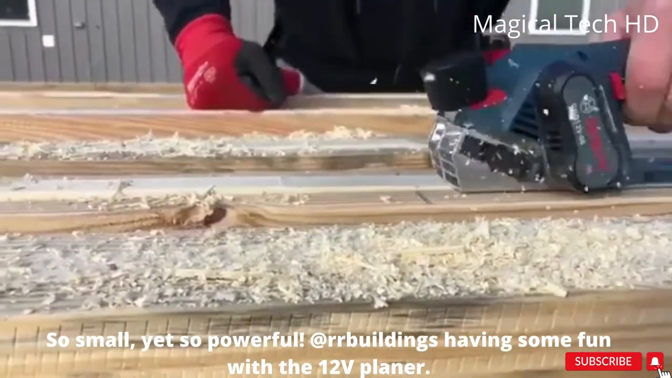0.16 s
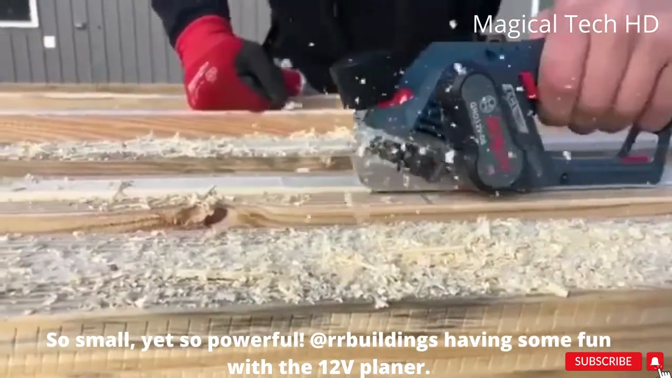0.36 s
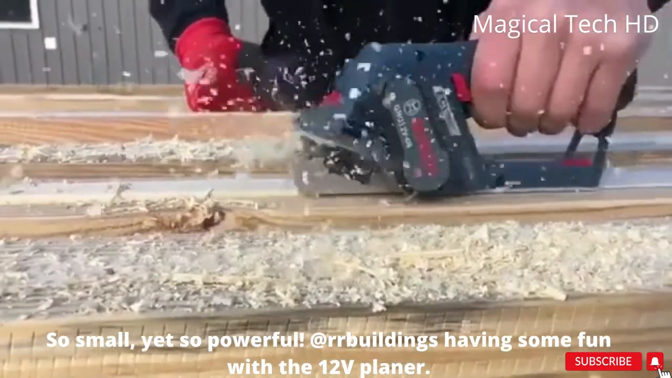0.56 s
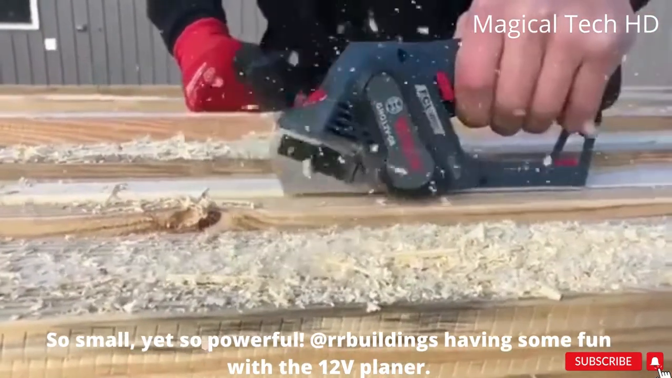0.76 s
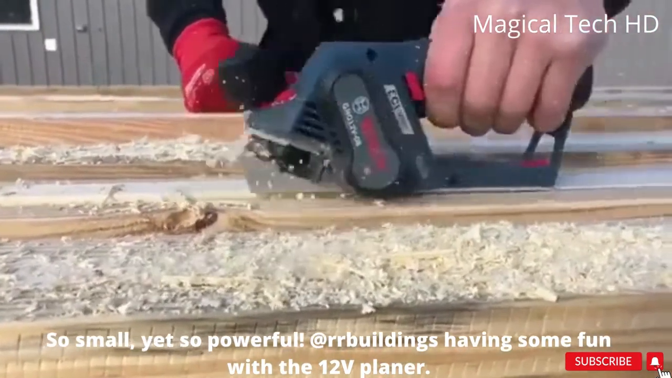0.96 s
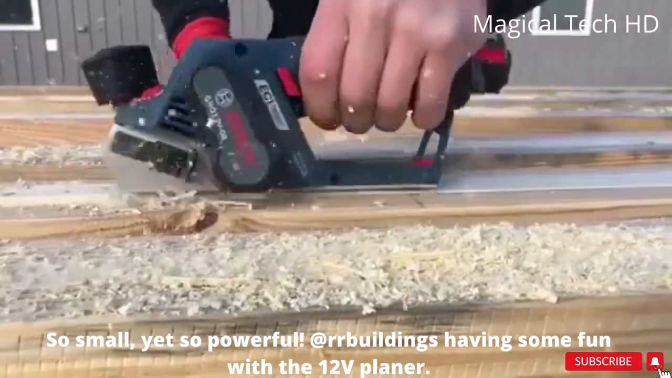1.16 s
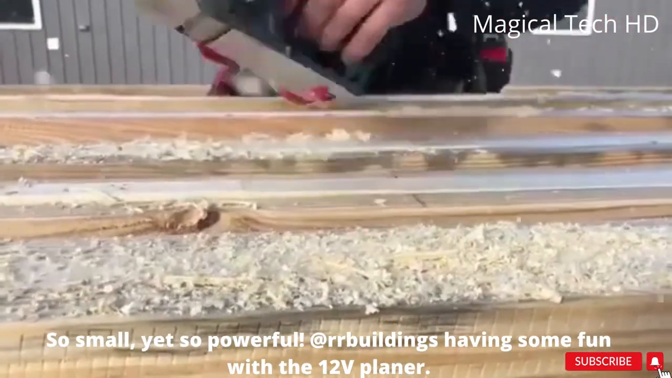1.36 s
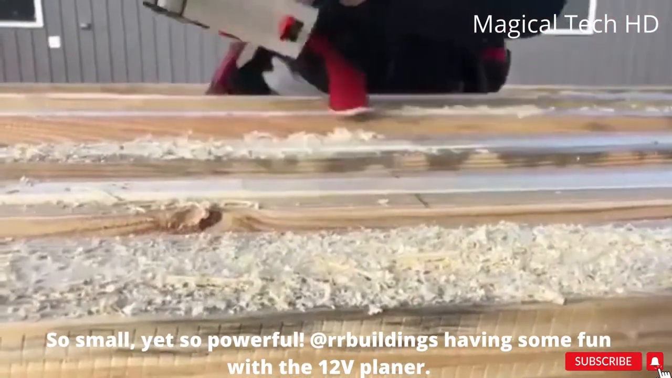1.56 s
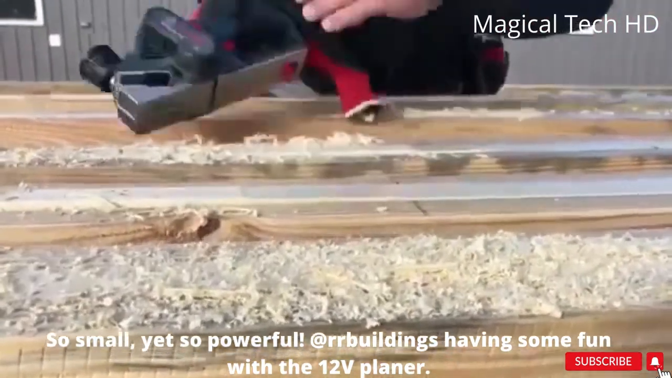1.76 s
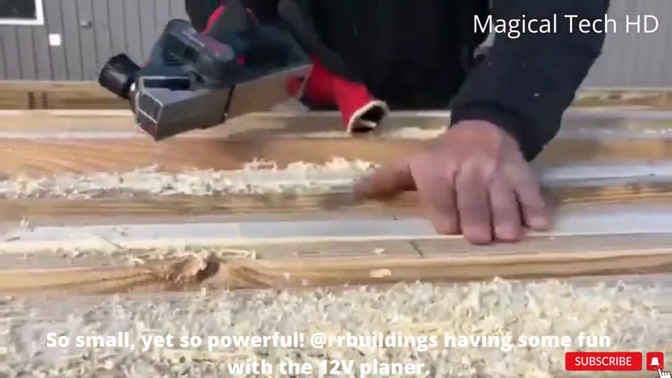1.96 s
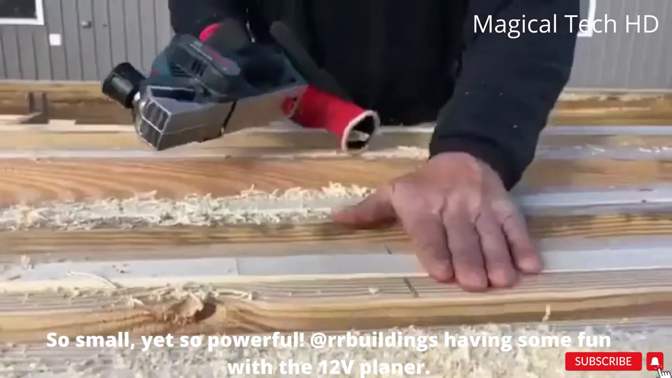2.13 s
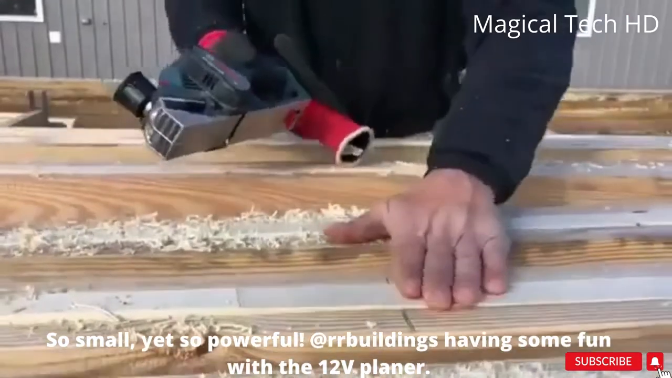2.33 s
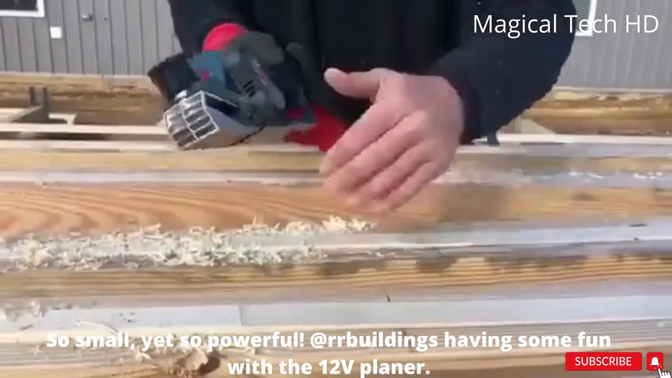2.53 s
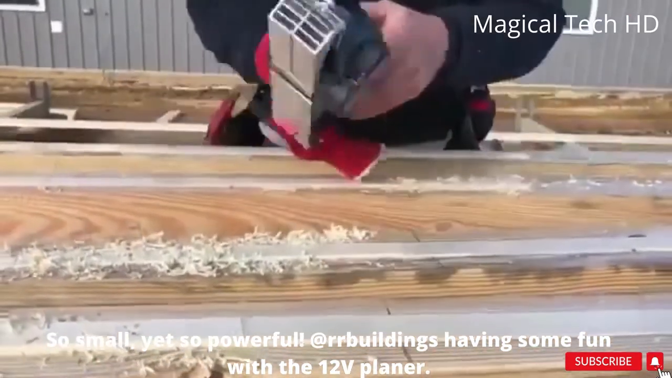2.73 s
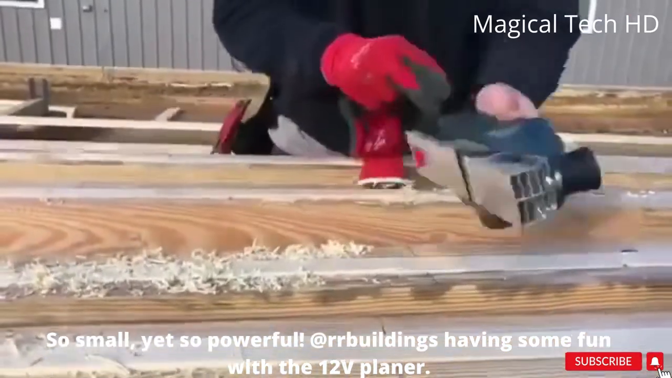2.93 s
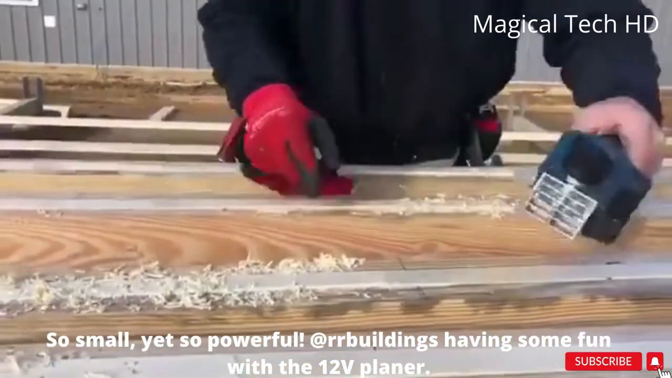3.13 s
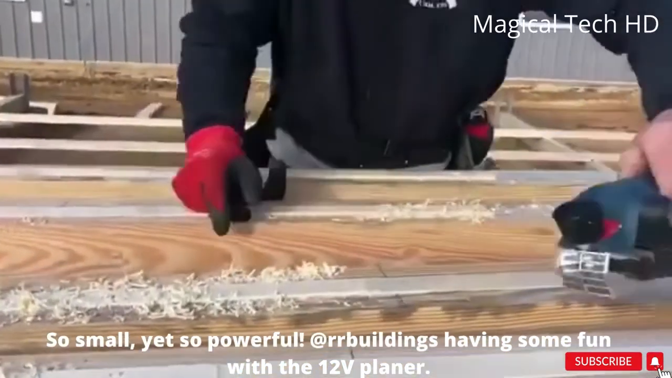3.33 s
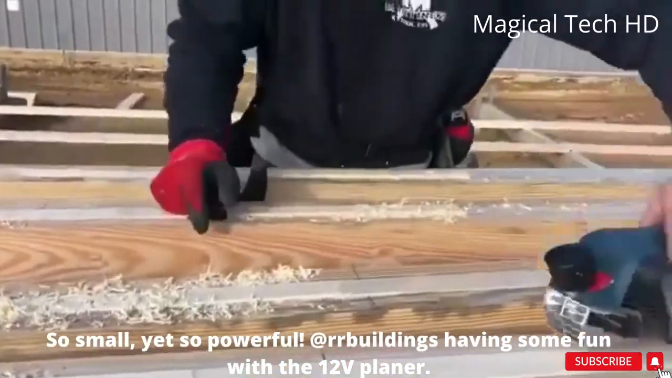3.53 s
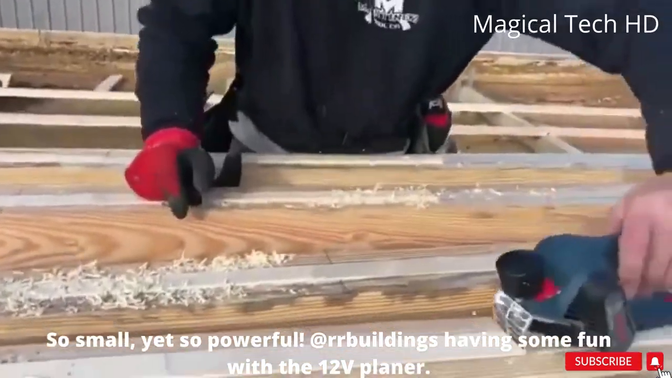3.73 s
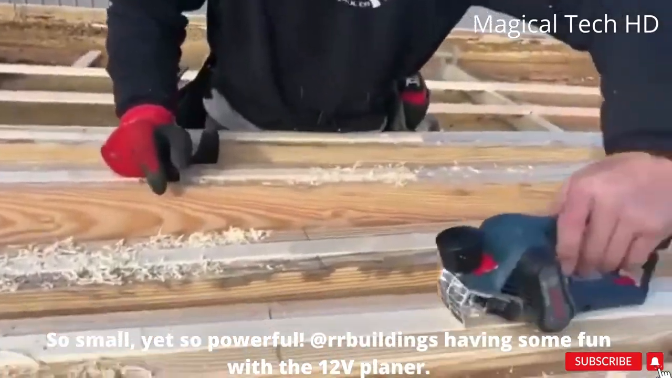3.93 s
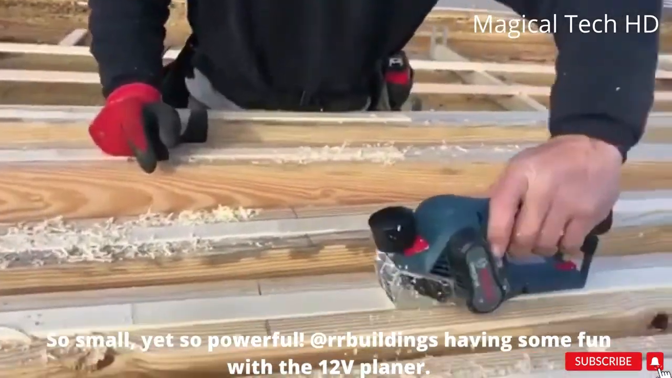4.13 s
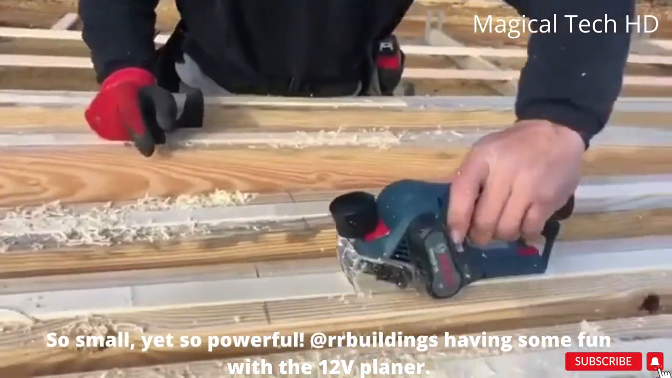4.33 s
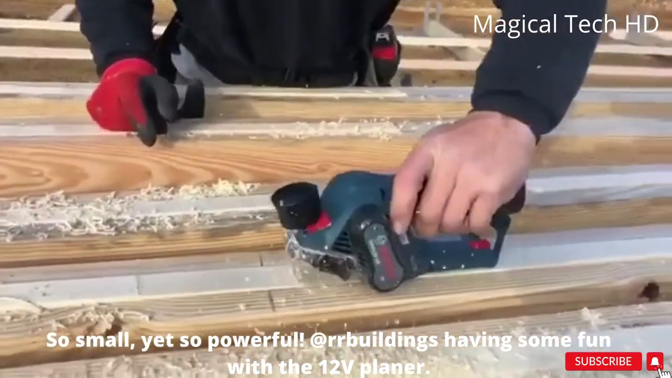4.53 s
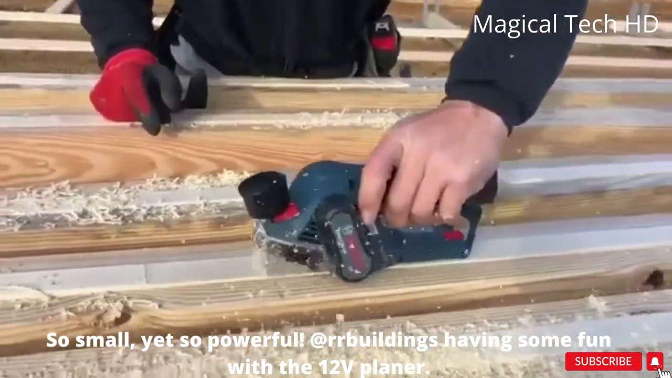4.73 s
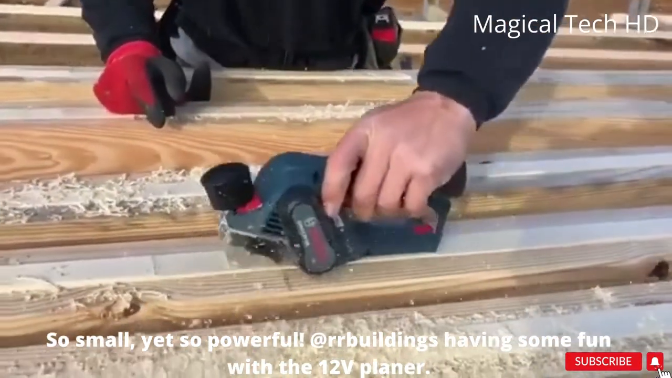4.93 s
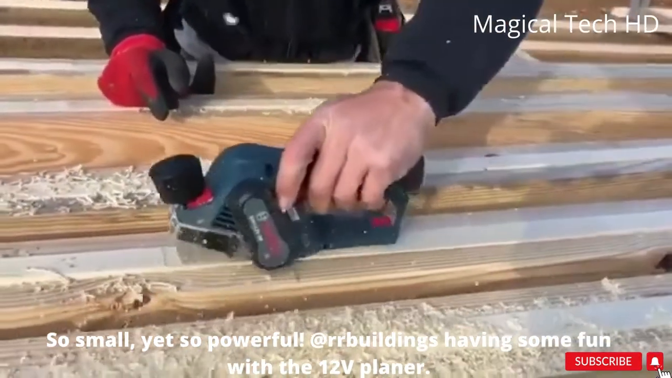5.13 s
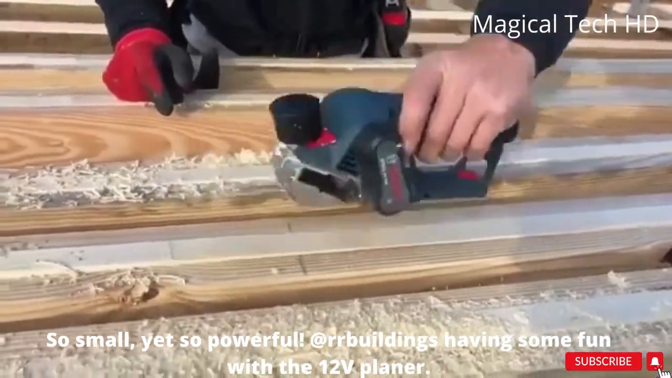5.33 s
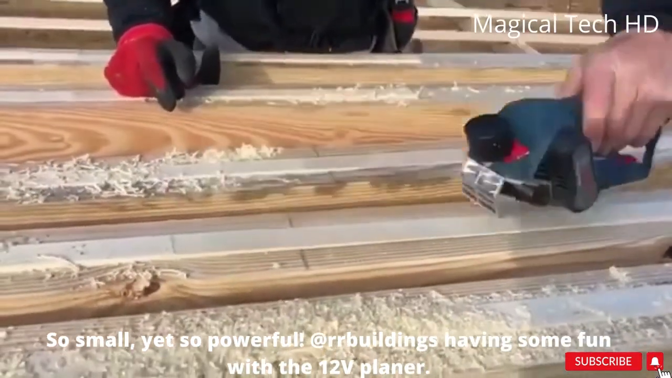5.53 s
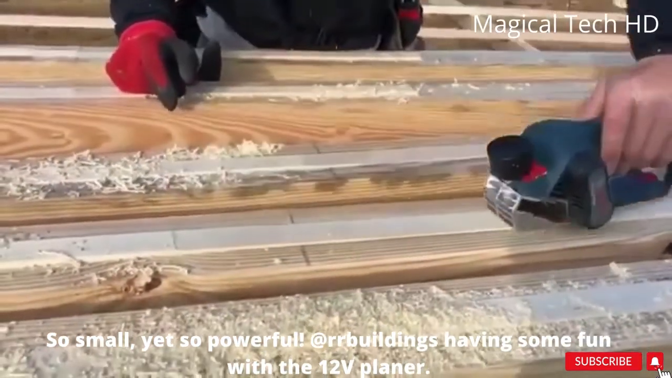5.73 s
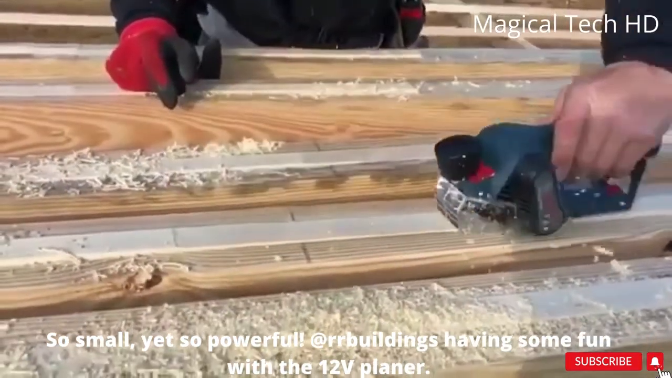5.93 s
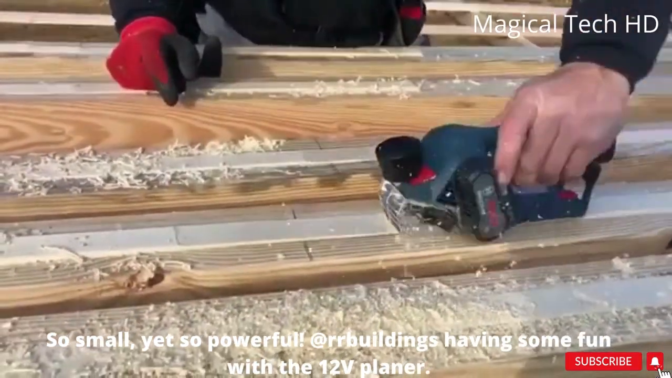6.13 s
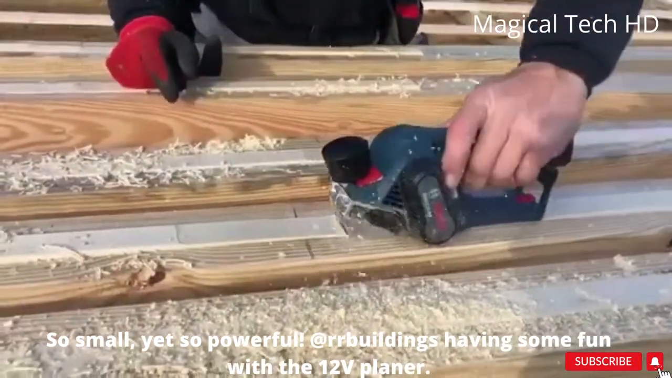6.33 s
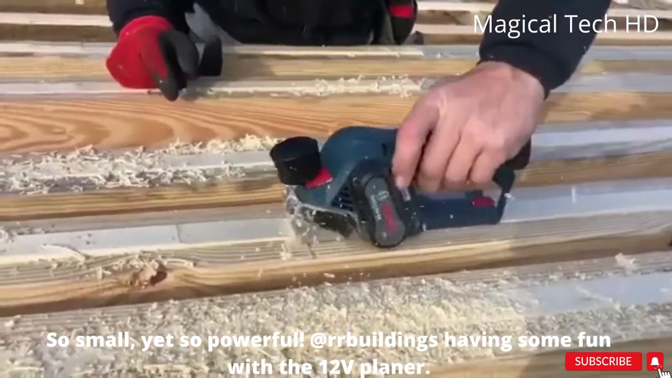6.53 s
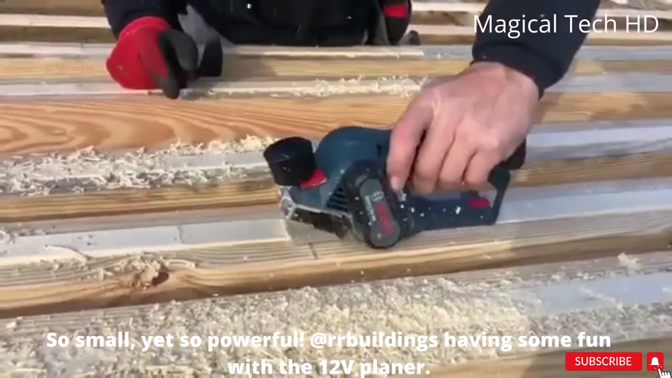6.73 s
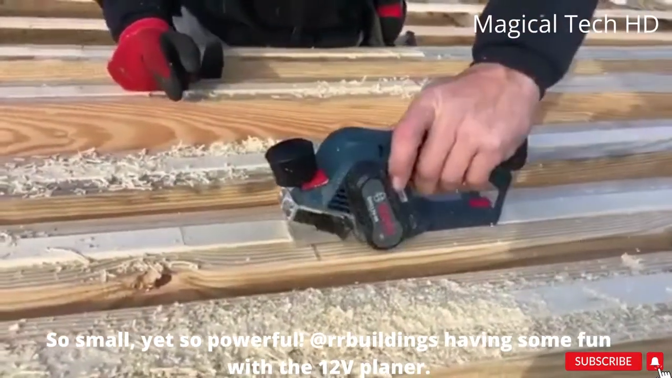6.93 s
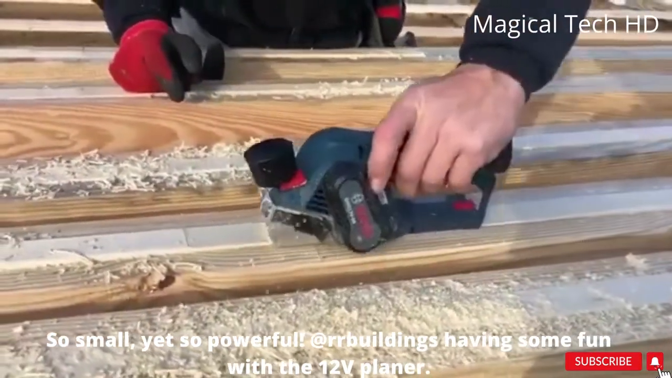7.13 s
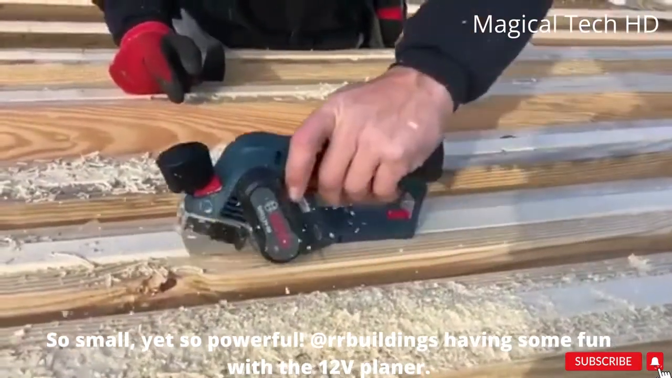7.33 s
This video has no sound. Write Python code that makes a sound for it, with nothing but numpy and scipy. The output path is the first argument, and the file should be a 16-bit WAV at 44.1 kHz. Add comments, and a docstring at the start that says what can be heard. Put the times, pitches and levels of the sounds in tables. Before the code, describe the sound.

A small electric hand planer whines and tears at softwood, brakes to quiet hand strokes and clicks, then spins up and planes again.

```python
"""A cordless hand planer on softwood planks, close to one microphone, with wind buffeting its port throughout.
First it cuts and lifts: the drum's speed sets hum, belt and motor whine and the blade's once-a-turn bite.
The brake silences it; a hand strokes the planed board in grainy hiss, and small things click as short rings.
Then the motor spins up again, the sole lands with a snap and a thud, and further passes tear at the wood,
with soft low thumps of handling. In both runs larger chips snap off as bursts of a millisecond or two."""
import sys
import numpy as np
from scipy import signal
from scipy.fft import rfft, irfft, next_fast_len
from scipy.io import wavfile
from scipy.ndimage import uniform_filter1d

SR = 44100
rng = np.random.default_rng(int(sys.argv[2]) if len(sys.argv) > 2 else 0)


def waveform_to_disk(signal):
    """Save audio, clipped to [-1, 1], as 16-bit WAV at the path in sys.argv[1]."""
    frames = np.transpose(np.atleast_2d(signal))
    scaled = np.clip(frames, -1, 1) * 32767
    samples = np.round(scaled).astype(np.int16)
    wavfile.write(sys.argv[1], SR, samples)


N = 329943

# Housing, damped while the sole presses on the wood; one table a run:
# time_s, level_db, drone_over_level_db, belt_cover_over_level_db, clean_share (0-1)
HOUSING_RUNS = [
    [(0, -29, -6, -3.5, 0.35), (.2, -30.5, -2, -3, 0.62), (.235, -35, -8, -2, .4),
     (.265, -27, -3.5, -2, 0.55), (.46, -25, -9, -5.5, .5), (.54, -38, -5, 2, 0.1),
     (.62, -27.5, -8.5, -5, 0.57), (.74, -40, -5, 10, 0.17), (.765, -26.5, -6, 2.5, 0.51),
     (1.07, -25.5, -9.5, -2.5, 0.58), (1.12, -33, -13, -3.5, 0.78), (1.29, -33.5, -9.5, -4, 0.29),
     (1.33, -24, -9, -6, 0.18), (1.4, -35, -15, -6, 0.6), (1.55, -52, -2, 6, 0.29), (1.66, -77, 9, 4, .1)],
    [(3.56, -64, -8, -11, 0.2), (3.65, -49, -2, 7, 0.4), (3.75, -31, 2, -4, 0.35),
     (3.86, -32, -8, -3, 0.13), (4.02, -27.5, 1, -10, 0.34), (4.13, -27.5, -11, -9, 0.27),
     (4.19, -24, -6.5, -6.5, 0.57), (4.4, -24.5, -5.5, -1, 0.74), (4.47, -28, -6.5, -10, 0.42),
     (4.61, -32.5, -2, -6, 0.43), (4.64, -26, -5.5, -10.5, 0.34), (4.88, -28.5, -9, -4.5, 0.5),
     (4.96, -26, -5, -1, 0.45), (5.04, -33, -5.5, -1, 0.46), (5.24, -35.5, -2, 3, 0.66),
     (5.29, -25, -5.5, -4.5, 0.78), (5.45, -28, 0.5, -6, 0.75), (5.8, -30, 1.5, -1.5, 0.71),
     (6.05, -24.5, -4, -6.5, 0.61), (6.1, -32, -4.5, 0, 0.4), (6.155, -29, -9, -12, 0.34),
     (6.17, -23, -5, -1.5, .4), (6.25, -35, -2, -3.5, 0.37), (6.5, -24.5, -8, -5, 0.55),
     (6.72, -31, -7.5, -5, 0.37), (6.76, -24, -4.5, -1, .65), (7.42, -25, -5.5, -2, 0.64),
     (7.48, -56, -4, 11, 0.1)],
]

START_S, FREE_SPEED, SPIN_UP_S = 3.55, 170, .42  # trigger pressed; unloaded turns/s; time constant in s
BRAKE_S = 1.36  # the brake grips
BELT_ORDER, SLOT_ORDER = 20, 28  # cycles a drum turn: belt teeth, motor slots


def amp(db):
    """Amplitude ratio of a level in dB."""
    return 10 ** (np.asarray(db) / 20)


def unit(x):
    """x scaled to rms 1."""
    return x / np.sqrt(np.mean(x ** 2) + 1e-20)


def seconds():
    """Time of every sample in s."""
    return np.arange(N) / SR


def along(points, hz):
    """Interpolate (Hz, value) points on a log frequency axis."""
    f, v = np.transpose(points)
    return np.interp(np.log(hz + 1), np.log(f + 1), v)


def curves(rows):
    """One value a sample for each column after the time."""
    time_s, *columns = np.transpose(rows)
    return [np.interp(seconds(), time_s, column) for column in columns]


def wobble(rate):
    """A random curve with rate knots a second, joined by straight lines."""
    knots = rng.standard_normal(int(N * rate / SR) + 2)
    return np.interp(np.arange(N) * (rate / SR), np.arange(len(knots)), knots)


def filtered(x, response):
    """x shaped by a gain that is a function of frequency."""
    m = next_fast_len(N + 8192)
    return irfft(rfft(x, m) * response(np.fft.rfftfreq(m, 1 / SR)), m)[:N]


def noise(spectrum, gate=1):
    """Coloured noise of rms 1, gated before the colour."""
    return unit(filtered(gate * rng.standard_normal(N), lambda hz: amp(along(spectrum, hz))))


def steady(x, span_s):
    """x with its level evened out over the given time."""
    return x / np.sqrt(np.abs(uniform_filter1d(x ** 2, size=int(span_s * SR))) + 1e-9)


def patchy(x, patch_db):
    """x with random gain patches some hundred Hz wide and tens of ms long."""
    z = signal.stft(x, nperseg=512)[2]
    field = uniform_filter1d(rng.standard_normal(z.shape), size=4, axis=0)
    field = uniform_filter1d(field, size=5, axis=1)
    return signal.istft(z * amp(patch_db * unit(field)), nperseg=512)[1][:N]


def split(x, edges_hz):
    """x cut into neighbouring bands, each of even level."""
    below = [filtered(x, lambda hz: 1 / (1 + (hz / edge) ** 12)) for edge in edges_hz]
    return [steady(high - low, .08) for low, high in zip([0] + below, below + [x])]


def swells(rows, still_db, column):
    """Gain of events that rise and fall by 20 dB in their given times, over a still level."""
    t = np.arange(0, N / SR, .001)
    power = 0
    for row in rows:
        peak_s, rise_s, fall_s = row[:3]
        away = np.where(t < peak_s, (peak_s - t) / rise_s, (t - peak_s) / fall_s)
        power = power + amp(row[column] - 20 * away ** 1.3) ** 2
    return np.sqrt(amp(still_db) ** 2 + np.interp(seconds(), t, power))


def speed():
    """Drum turns/s: after the trigger the motor climbs towards its free speed until the load holds it."""
    # Drum speed under load: time_s, turns_per_s
    loaded_speed = [(0, 168.8), (.16, 168), (.26, 165.6), (.42, 166), (.5, 163.5), (.75, 149.8),
                    (.9, 156.5), (1.05, 163), (1.12, 160.5), (1.2, 153.1), (1.3, 131), (1.62, 25),
                    (3.5, 12), (3.58, 153), (4.62, 153.5), (4.9, 149.2), (5.05, 150.6), (5.2, 149),
                    (5.26, 146), (5.5, 161.6), (5.7, 164.9), (5.85, 169.3), (6.0, 167.1), (6.4, 156),
                    (6.5, 157.2), (6.7, 157), (6.9, 162), (7.1, 165.4), (7.48, 161)]
    t = seconds()
    loaded, = curves(loaded_speed)
    climb = FREE_SPEED * (1 - np.exp(-np.maximum(t - START_S, .02) / SPIN_UP_S))
    return np.where(t > START_S, np.minimum(climb, loaded), loaded)


def drum():
    """Turns made so far: the speed summed up, with a little hunting."""
    return np.cumsum(speed() * (1 + 0.0024 * wobble(60))) / SR


def running(rows):
    """1 while a table's times last, 0 outside, with 20 ms ramps."""
    t = seconds()
    return np.clip(np.minimum(t - rows[0][0] + .02, rows[-1][0] + .02 - t) / .02, 0, 1)


def both_runs(tables):
    """Columns of the two runs, and the switch that silences the pause."""
    first, second = tables
    return curves(list(first) + list(second)), running(first) + running(second)


def lift_db(hz):
    """Lift by the housing shell's resonant modes."""
    # Shell modes: centre_hz, width_hz, lift_db
    shell_modes = [(992, 71, 5), (1157, 90, 5.5), (1494, 140, 9), (2138, 76, 5.5), (2946, 570, 5.5),
                   (4103, 356, 7)]
    return sum(db / (1 + (2 * (hz - centre) / width) ** 2) for centre, width, db in shell_modes)


def shell(hz):
    """Gain of the housing: its broad colour, lifted at its modes."""
    # Broad colour of the housing: frequency_hz, relative_level_db
    shell_colour = [(150, -31), (250, -23.5), (640, -12.5), (850, -10), (1300, -7.5), (1800, -4),
                    (2600, -4.5), (3400, -7), (4400, -9.5), (5500, -11.5), (7150, -17), (12000, -120)]
    return amp(along(shell_colour, hz) + lift_db(hz))


def throb(turns):
    """-1 to 1 once a lap of the belt, highest as its joint passes."""
    lap_turns = 23.9  # drum turns a belt lap
    joint_s = (.59, 5.738)  # a moment in each run when the joint passes
    lean = .5  # each throb rises faster than it falls
    first, second = (turns[int(s * SR)] for s in joint_s)
    origin = np.where(np.arange(N) < START_S * SR, first, second)
    lap = 2 * np.pi * (turns - origin) / lap_turns
    return np.cos(lap - lean * (1 - np.cos(lap)))


def housing(turns):
    """Separately fluttering drum orders and a once-a-turn rattle ring through the shell."""
    # Depth of the belt-lap swing for a fully clean ring: underside, drone, belt_cover, vents (ratios)
    throb_depths = (0.19, 0.81, 0.19, 0.22)
    under_db, under_follows = -13, 0.48  # underside against the vents; how far it follows the drone
    strong_order, strong_db = 6, 5  # this order stands above its neighbours by this much
    (level_db, drone_db, cover_db, clean), on = both_runs(HOUSING_RUNS)
    # uneven rotation smears the high orders more than the low ones
    shaken = turns + .008 * wobble(70)
    orders = 0
    for k in range(2, 32):
        gain = amp(4.85 * wobble(20) + strong_db * (k == strong_order))
        orders = orders + gain * np.sin(2 * np.pi * (k * shaken + rng.random()))
    rattle = (1 + 0.6 * np.cos(2 * np.pi * turns)) * patchy(rng.standard_normal(N), patch_db=4)

    share = np.clip(clean, 0, 1)
    clean_ring = np.sqrt(share) * steady(filtered(orders, shell), 0.18)
    ring = clean_ring + np.sqrt(1 - share) * unit(filtered(rattle, shell))
    bands = split(ring, [780, 1280, 1800])  # underside, drone, belt cover, vents
    offsets_db = (under_db + under_follows * drone_db, drone_db, cover_db, 0)
    lap = throb(turns)
    mix = 0
    for band, db, depth in zip(bands, offsets_db, throb_depths):
        swing = 1 + np.clip(depth * share, 0, .85) * lap
        mix = mix + amp(level_db + db) * swing * band
    chatter = amp(1.3 * wobble(45))
    return on * chatter * mix


def whine(turns):
    """Unbalance once a turn, belt teeth and motor slots; the higher the order, the rougher the line."""
    # Single tones: time_s, drum_unbalance_db, belt_tooth_db
    tone_levels = [(0, -51, -40), (.3, -48, -35), (.47, -48, -41), (.55, -70, -55), (.65, -62, -36),
                   (.76, -60, -52), (.84, -43, -33), (.98, -44, -33), (1.08, -45, -48), (1.2, -55, -46),
                   (1.55, -58, -80), (3.65, -66, -75), (3.84, -50, -36), (4.1, -58, -46), (4.3, -60, -37),
                   (4.55, -62, -39), (4.85, -62, -33), (5.2, -57, -45), (5.33, -58, -28), (5.42, -56, -34),
                   (5.93, -48, -32), (6.04, -42, -42), (6.3, -42, -50), (6.6, -48, -43), (6.82, -41, -42),
                   (7.0, -47, -50), (7.42, -49, -43), (7.48, -58, -52)]
    slot_db, slot_power, mode_lift = -16.5, 1.5, 2  # against the housing; growth with speed; lift by shell modes
    effort_gain_db = 8  # the slots sing louder by this for each 100 turns/s2 of speeding up
    cry_db, cry_s = 22, .045  # the slots cry out as the brake grips; half the length of the cry
    (level_db, *_), on = both_runs(HOUSING_RUNS)
    rate = uniform_filter1d(speed(), size=4000)
    effort_db = effort_gain_db * np.clip(np.gradient(rate) * SR / 100, 0, 2.6)
    brake_db = cry_db * np.exp(-((seconds() - BRAKE_S - cry_s) / cry_s) ** 2)
    slots_db = level_db + slot_db + 20 * slot_power * np.log10(rate / FREE_SPEED)
    slots_db = slots_db + mode_lift * lift_db(SLOT_ORDER * rate) + effort_db + brake_db
    unbalance_db, belt_db = curves(tone_levels)

    lines = 0
    for k, db in ((1, unbalance_db), (BELT_ORDER, belt_db), (SLOT_ORDER, slots_db)):
        gain = np.sqrt(2) * amp(db + 2.5 * wobble(45))
        lines = lines + gain * np.sin(2 * np.pi * k * (turns + 0.004 * wobble(120)))
    return on * lines


def blade():
    """Tearing dB, fizz dB and bite: the free drum's air gives way to the cut while the blade is in the wood."""
    # Blade in the wood: start_s, end_s, tearing_db, fizz_db, bite (0-1)
    passes = [(-.1, .1, -28.5, -34.5, 0), (.15, 0.25, -26, -26, 0.65), (0.405, .77, -28, -25, 0.45),
              (1.052, 1.315, -26.5, -25, 0.34), (4.023, 4.6, -26, -24.5, 0.47),
              (4.612, 5.27, -27, -22.5, 0.47), (5.97, 6.747, -26, -24.5, 0.5), (6.843, 6.853, -18, -21, 0),
              (6.966, 7.16, -27, -30, 0.11), (7.16, 7.6, -25.5, -22.5, 0.4)]
    air_tear_db, air_fizz_db, air_power = -29.5, -36, 1.47  # free drum's hiss; it grows with this power of speed
    brake_db_per_s = 108  # the brake stills the air
    edge_s = 0.07  # time the blade takes to enter or leave the wood
    t = seconds()
    braked_db = brake_db_per_s * np.where(t < START_S, np.maximum(t - BRAKE_S, 0), 0)
    air_db = 20 * air_power * np.log10(speed() / FREE_SPEED) - braked_db
    free_tear_db, free_fizz_db = air_db + air_tear_db, air_db + air_fizz_db
    tear_db, fizz_db, bite = free_tear_db, free_fizz_db, 0
    for start, end, cut_tear_db, cut_fizz_db, share in passes:
        depth = np.clip(np.minimum(t - start, end - t) / edge_s + .5, 0, 1)
        tear_db = tear_db + depth * (cut_tear_db - free_tear_db)
        fizz_db = fizz_db + depth * (cut_fizz_db - free_fizz_db)
        bite = bite + depth * share
    return tear_db, fizz_db, bite


def cut(turns):
    """The blade tears a burst of fibres once a turn, some far louder than others, over air hiss."""
    # Colour of torn fibres: frequency_hz, relative_level_db
    fibre_colour = [(1500, -30.5), (3000, -7), (4200, -6), (5300, -7.5), (8200, -3.5), (10500, -5),
                    (12700, -7.5), (14200, -8.5)]
    tear_db, fizz_db, bite = blade()
    size_db = np.clip(5 * rng.standard_normal(2000), -20, 9)
    size_db[::2] -= 2.5  # the tool rocks: every second turn bites less
    burst = amp(size_db)[turns.astype(int)] * np.exp(-(turns % 1) / 0.21)
    # no bite below 95 turns/s, the full bite from 120 up
    at_speed = np.clip((np.gradient(turns) * SR - 95) / 25, 0, 1)
    share = np.clip(bite, 0, 1) * at_speed
    gate = np.sqrt(share) * unit(burst) + np.sqrt(1 - share) * amp(2.24 * wobble(40))
    hiss = gate * patchy(rng.standard_normal(N), patch_db=3.5)
    tear, fizz = split(filtered(hiss, lambda hz: amp(along(fibre_colour, hz))), [9500])
    return amp(tear_db) * tear + amp(fizz_db) * fizz


def wind_and_handling():
    """Lumpy low noise of wind at the microphone port, and swells of a second low noise: flutter, soft thumps."""
    # Buffeting: time_s, buffet_db
    buffeting = [(0.0, -45), (0.25, -54.5), (0.35, -37), (0.58, -62.5), (1.31, -47), (2.06, -53.5),
                 (2.46, -38.5), (3.4, -57.5), (3.75, -47), (4.44, -63.5), (5.69, -56), (6.02, -39),
                 (6.08, -61.5), (6.31, -58.5), (6.37, -41.5), (6.44, -52), (7.33, -58.5), (7.48, -50)]
    # Low bursts: wind flutter, and the soft thumps of landing and handling at 3.77, 5.95 and 6.35 s:
    # peak_s, rise_s, fall_s, level_db
    low_bursts = [(.1, 0.34, 0.54, -46), (.7, 0.16, 0.97, -48.5), (3.77, .06, 0.15, -35.5),
                  (4.35, 0.37, .1, -45.5), (4.95, 0.42, 0.52, -50.5), (5.95, 0.097, 0.19, -39.5),
                  (6.35, 0.041, 0.052, -39.5)]
    # Colour of the buffeting: frequency_hz, relative_level_db
    rumble_colour = [(12, -48), (20, -15), (45, -6), (65, 3.5), (130, 0), (162, -14.5), (200, -40),
                     (260, -38), (440, -120)]
    # Colour of the low bursts: frequency_hz, relative_level_db
    burst_colour = [(60, -23), (130, 1.5), (220, 4.5), (330, -4.5), (600, -37.5)]
    between_db, follows = -61.5, 0.13  # flutter between bursts; how far it follows the buffeting
    buffet_db, = curves(buffeting)
    still_db = between_db + follows * (buffet_db - buffet_db.mean())
    bursts = swells(low_bursts, still_db, column=3) * steady(noise(burst_colour), 0.12)
    lumps = amp(9.2 * wobble(16))
    return amp(buffet_db) * steady(lumps * noise(rumble_colour), .2) + bursts


def splinters():
    """Larger chips snap off: a burst of a millisecond or two, half tone and half bright noise."""
    # Chips: start_s, level_db, pitch_hz
    chips = [(0.0357, -4.5, 10150), (0.065, -6, 8400), (0.61, -9, 8050), (0.7274, -12, 7040),
             (0.7412, -13, 9150), (1.1172, -5, 7130), (1.2137, -6, 9400), (1.2195, -8, 12900),
             (1.2262, -6, 8340), (1.2398, -9, 8900), (1.255, -6.5, 8000), (1.283, -4, 7040),
             (1.2984, -5.5, 6830), (1.3752, -2.5, 8960), (4.0281, -10, 9200), (4.531, -16, 10100),
             (4.5508, -6, 8000), (4.6365, -8, 7340), (4.6494, -8, 10500), (4.6745, -8, 7700),
             (4.886, -9, 12900), (4.9472, -9, 9700), (5.1397, -7, 12600), (5.2608, -4, 7700),
             (5.3444, -4, 8700), (6.1319, -7, 7900), (6.2009, -4, 8000), (6.2252, -12, 8060),
             (6.2627, -12, 8930), (6.6246, -6, 8230), (7.335, -7, 10000)]
    out, t = np.zeros(N + SR), np.arange(300) / SR
    envelope = np.exp(-((t - .0012) / 0.00059) ** 2)
    for s, db, hz in chips:
        body = .5 * np.sin(2 * np.pi * hz * t) + .5 * np.diff(rng.standard_normal(len(t) + 1))
        out[round(s * SR):][:len(t)] += amp(db) * envelope * body
    return out[:N]


def strokes():
    """Skin and cloth slide on the planed face: grainy hiss, the board's duller voice and its two hollow notes."""
    # Hand and sleeve on wood: peak_s, rise_s, fall_s, hiss_db, board_db, hollow_db
    hand_moves = [(1.83, 0.22, 0.12, -59, -62, -88), (2.064, 0.0044, 0.079, -43, -49.5, -53),
                  (2.132, 0.015, 0.043, -47, -47, -74), (2.25, 0.087, .1, -56, -60.5, -80),
                  (2.36, 0.054, 0.081, -41.5, -52.5, -54.5), (2.51, 0.068, 0.068, -44, -51, -49),
                  (2.62, 0.043, 0.035, -42.5, -51.5, -53), (2.807, .004, 0.018, -47, -58, -85),
                  (2.98, 0.25, .2, -50.5, -51, -76), (3.19, 0.0069, 0.055, -46, -56.5, -75),
                  (3.43, 0.28, .12, -59.5, -58, -85)]
    # Colour of skin on wood: frequency_hz, relative_level_db
    skin_colour = [(710, -45), (1200, -25), (1510, -30.5), (2330, 3.5), (3110, 6.5), (5000, 1.5), (5370, 2),
                   (11900, -0.5), (14200, 2.5)]
    # Colour of the board: frequency_hz, relative_level_db
    board_colour = [(150, -36.5), (250, -5), (500, 0.5), (1000, -1.5), (1490, -2.5), (2000, -4.5),
                    (2600, -26), (4400, -120)]
    # Colour of the hollow notes: frequency_hz, relative_level_db
    plank_colour = [(300, -59), (470, -32), (540, 2), (620, -16), (850, -8), (970, 3), (1060, -15),
                    (1400, -64)]
    still_hiss_db, still_board_db = -69, -68  # between strokes
    grainy = patchy(noise(skin_colour, gate=amp(2.4 * wobble(300))), patch_db=3.5)
    hiss = swells(hand_moves, still_hiss_db, column=3) * grainy
    board = swells(hand_moves, still_board_db, column=4) * steady(noise(board_colour), 0.088)
    hollow = swells(hand_moves, -120, column=5) * steady(noise(plank_colour), .06)
    return hiss + board + hollow


def clicks():
    """Taps on wood and plastic: a short ring of narrow noise and a crack."""
    # Taps: start_s, ring_db, pitch_hz, crack_over_ring_db
    taps = [(1.663, -50, 2640, -10), (1.927, -52, 1390, -7), (2.128, -33, 975, -5), (2.132, -32, 2600, -18),
            (2.595, -49, 950, -3), (2.807, -44.5, 1710, -5), (2.904, -38, 1790, -9),
            (2.982, -32.5, 815, -19), (3.186, -42, 3600, 5), (3.313, -52, 598, -11), (3.376, -51, 1380, -2),
            (3.53, -51, 638, 2), (3.595, -46, 1930, -12)]
    ring_t60_s, crack_t60_s = 0.032, 0.015
    out, t = np.zeros(N + SR), np.arange(SR // 8) / SR
    for s, db, hz, crack_db in taps:
        phase = 2 * np.pi * hz * t + 0.19 * np.cumsum(rng.standard_normal(len(t)))
        ring = amp(-60 * t / ring_t60_s) * np.sin(phase)
        crack = amp(crack_db - 60 * t / crack_t60_s) * rng.standard_normal(len(t))
        out[round(s * SR):][:len(t)] += amp(db) * (ring + crack)
    return out[:N]


def low_thumps():
    """Low thumps that sink in pitch, each a decaying sine: eddies at the port, and one knock at 6.345 s."""
    # Thumps: start_s, level_db, base_pitch_hz (starts at 1.84 times this, settles at 0.74 times)
    thumps = [(1.713, -35.5, 83.4), (1.791, -35, 99.6), (2.223, -29, 86.6), (2.359, -35, 89.5),
              (2.449, -23, 137), (2.561, -26.5, 78.1), (2.828, -30, 70.0), (3.016, -36, 67.3),
              (3.49, -37, 80), (6.345, -30, 66)]
    out, t = np.zeros(N + SR), np.arange(SR // 5) / SR
    onset = 1 - np.exp(-t / 0.0065)
    for s, db, hz in thumps:
        cycles = hz * (0.74 * t + 0.011 * (1 - np.exp(-t / 0.01)))
        out[round(s * SR):][:len(t)] += amp(db - 60 * t / 0.19) * onset * np.sin(2 * np.pi * cycles)
    return out[:N]


def sole():
    """The sole lands on the plank: a bright snap and a low thud, each a decaying sine."""
    # Landing: start_s, snap_db, snap_hz, snap_t60_s, thud_db, thud_hz, thud_t60_s
    landing = (3.7433, -7, 2900, .009, -31, 260, .1)
    s, snap_db, snap_hz, snap_t60, thud_db, thud_hz, thud_t60 = landing
    t = np.maximum(seconds() - s, 0)
    snap = amp(snap_db - 60 * t / snap_t60) * np.sin(2 * np.pi * snap_hz * t)
    thud = amp(thud_db - 60 * t / thud_t60) * np.sin(2 * np.pi * thud_hz * t)
    return snap + thud


def scene():
    """Planer, wood, hand, wind and handling summed at the microphone, the same on both channels."""
    turns = drum()
    planer = housing(turns) + whine(turns) + cut(turns)
    low_end = wind_and_handling() + low_thumps()
    mono = planer + low_end + splinters() + strokes() + clicks() + sole()
    return np.array([mono, mono])


def record(dry):
    """One microphone feeds both channels; its input stage rounds off peaks, then the top band is cut."""
    top_hz = 13900  # middle of a 200 Hz wide slope down to nothing
    soft = dry[0] / (1 + np.abs(dry[0] / .85) ** 4) ** (1 / 4)
    kept = filtered(soft, lambda hz: np.clip((top_hz + 100 - hz) / 200, 0, 1))
    return np.array([kept, kept])


dry = scene()
out = record(dry)
waveform_to_disk(out)
```